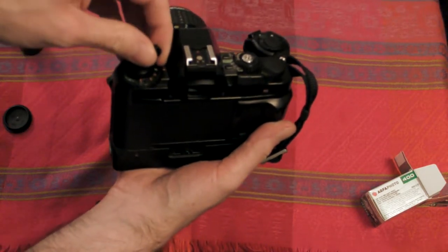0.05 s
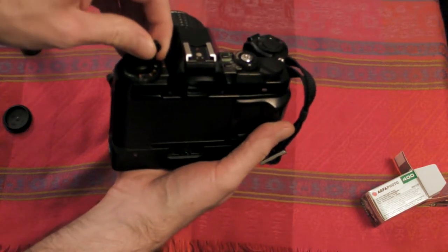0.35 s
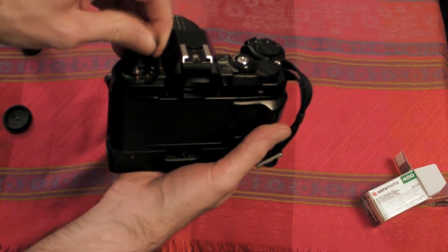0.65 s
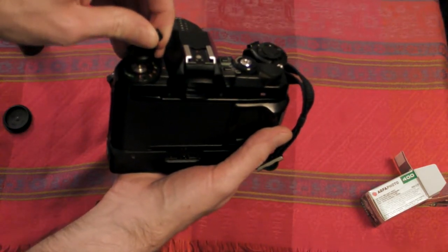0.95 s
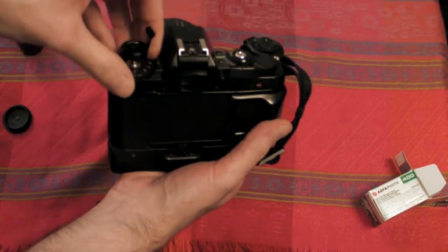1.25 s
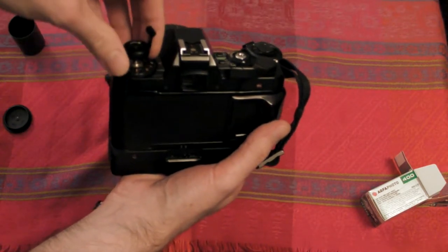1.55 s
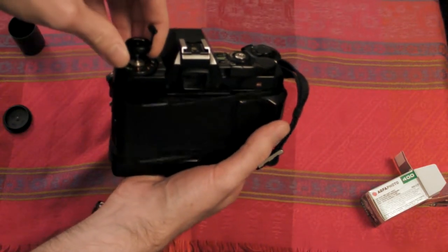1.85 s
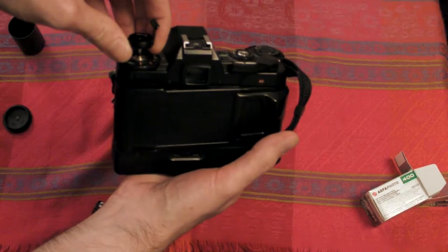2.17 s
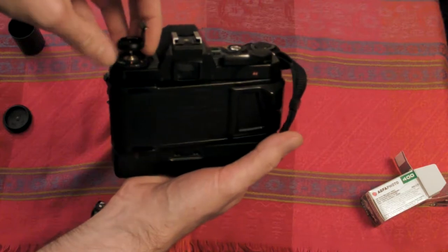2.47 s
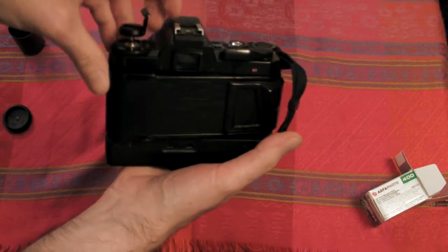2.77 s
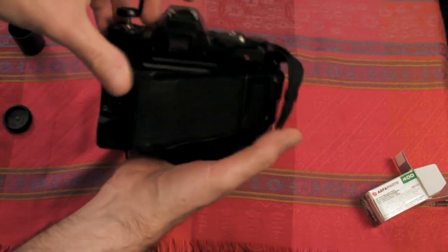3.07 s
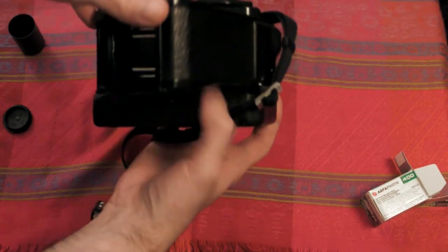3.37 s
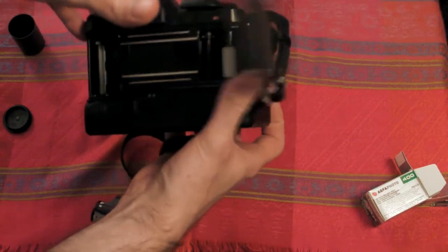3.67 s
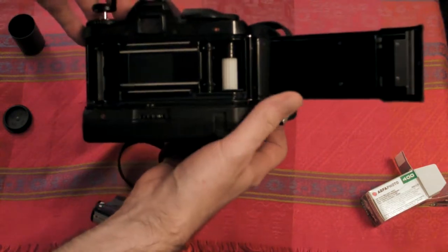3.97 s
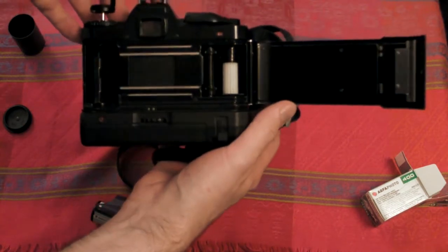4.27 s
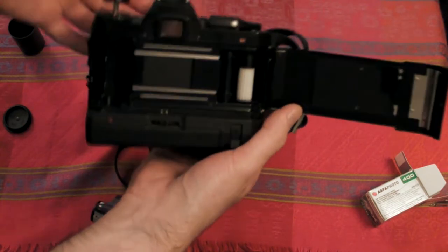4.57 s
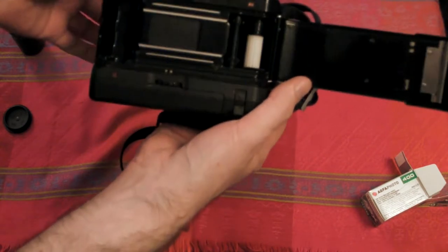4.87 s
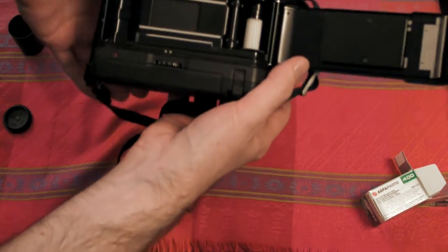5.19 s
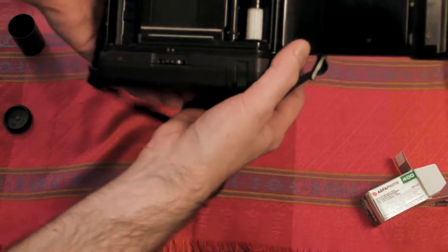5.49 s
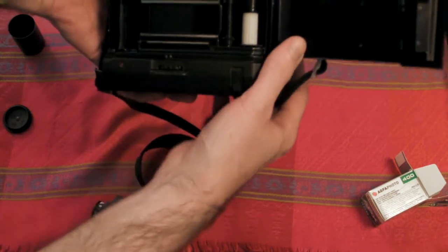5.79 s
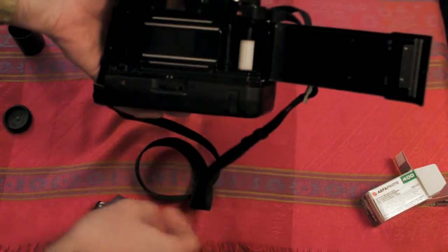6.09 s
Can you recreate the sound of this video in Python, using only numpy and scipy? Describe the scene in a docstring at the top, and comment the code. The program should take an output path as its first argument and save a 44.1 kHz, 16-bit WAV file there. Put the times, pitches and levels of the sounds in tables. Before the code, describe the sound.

Close, sharp clicks, a springy snap and small knocks of a film camera being opened by hand, over a faint electrical buzz.

```python
"""A small room, a cloth-covered table, a stereo pair close to a film camera being opened by hand.
Soft hiss and the buzz and thin whistle of video electronics lie under it from the start. At 0.6 s fingers
slide on the rewind knob and it clicks up. Near 1.8 s the latch slips and snaps, its spring rings and the
loose door rattles. Fingers tap and rub the case as the back swings open, with a light click at 3.5 s.
Past 5 s the back knocks twice against its stop and the fittings bounce to rest."""
import sys
import numpy as np
from scipy import signal
from scipy.fft import rfft, irfft
from scipy.io import wavfile

SR = 44100
rng = np.random.default_rng(int(sys.argv[2]) if len(sys.argv) > 2 else 0)


def generate_wav(sig):
    """Save sig (samples, or channels by samples) to the path in sys.argv[1] as 16-bit PCM at SR."""
    pcm = np.round(np.clip(np.atleast_2d(sig).T, -1, 1) * 32767).astype(np.int16)
    wavfile.write(sys.argv[1], SR, pcm)


N = 270774
TIME = np.arange(N) / SR
CUTOFF_HZ = 15900

# sprung parts hitting their stops: (time [s], part, snap level [dB], knock level [dB], decay [ms])
PART_STRIKES = [(.6068, "knob", -12, -25.5, 0.48), (1.7574, "latch", -16.5, -23.5, 4.1),
                (1.7624, "latch", -10, -46, 1.3), (1.8995, "spring", -9, -37, 3.5),
                (1.9082, "spring", -11, -28, 1.4), (1.9154, "spring", -19, -25.5, 1.4),
                (2.0229, "spring", -20, -52, 1.9), (2.0293, "spring", -18, -51, 1.8),
                (3.4772, "door", -29.5, -51, 1.1), (5.1839, "back", -21, -22, 1),
                (5.238, "back", -21.5, -23, 1.4)]
# each part's voice, part: (snap pitch [Hz], snap's room send [dB], knock pitch [Hz], knock sharpness [Q],
# knock's room send [dB], ring relative to snap [dB])
PART_VOICES = {"knob": (13354, -9.5, 1000, 4.5, -1, -21), "latch": (9000, -14, 2033, 2, -13, -22),
               "spring": (8199, -11.5, 1400, 2.8, -4.5, -22.5), "door": (6600, -14, 1778, 15, -6, -17),
               "back": (6203, -13, 1800, 2.5, -10.5, -14)}
# likeness of close sound at the two microphones: (frequency [Hz], correlation)
CLOSE_LIKENESS = [(1500, 0.82), (3400, 0.71), (5800, 0.1), (9000, 0.51), (13000, 0.74)]


def from_db(db):
    """Decibels to gain."""
    return 10 ** (np.asarray(db) / 20)


def at_hz(points, hz):
    """Read a table on a log-frequency axis."""
    known_hz, values = np.transpose(points)
    return np.interp(np.log(np.maximum(hz, 1)), np.log(known_hz), values)


def add(track, s, sound):
    """Mix a sound into a track from time s on."""
    start = round(s * SR)
    track[..., start:start + sound.shape[-1]] += sound[..., :N - start]


def butter(x, hz, kind, order=2):
    """Causal Butterworth filter."""
    return signal.sosfilt(signal.butter(order, np.clip(hz, 10, .48 * SR), kind, fs=SR, output="sos"), x)


def resonate(x, hz, width_hz):
    """One resonance with gain 1 at its peak."""
    return signal.lfilter(*signal.iirpeak(min(hz, SR / 2 - 1000), hz / width_hz, fs=SR), x)


def stereo_noise(length, likeness):
    """White noise that the two microphones share more or less, band by band."""
    mid, side = rfft(rng.standard_normal((2, length)))
    alike = np.clip(at_hz(likeness, np.fft.rfftfreq(length, 1 / SR)), -1, 1)
    spectra = np.sqrt((1 + alike) / 2) * mid + np.sqrt((1 - alike) / 2) * np.array([side, -side])
    return irfft(spectra, length)


def at_level(x, db, pan_db, window_s=.005):
    """Set a short sound's level, its energy counted over window_s; positive pan leans left."""
    power = np.sum(x ** 2, axis=1, keepdims=True) / (window_s * SR)
    return x / np.sqrt(power) * from_db(db + pan_db * np.array([[.5], [-.5]]))


def hiss():
    """Steady noise floor of the room and the microphones."""
    # noise spectrum: (frequency [Hz], density [dB per Hz])
    floor = [(25, -100), (40, -83), (60, -78.5), (110, -79), (220, -77), (400, -78.5), (650, -81.5),
             (1100, -84.5), (2000, -87.5), (4000, -90.5), (7000, -92), (9500, -98), (12200, -101.5),
             (15000, -99.5)]
    # its likeness at the two microphones: (frequency [Hz], correlation)
    likeness = [(1000, -.55), (4000, -.39), (8000, -.22), (13000, .1)]
    gain = from_db(at_hz(floor, np.fft.rfftfreq(N, 1 / SR))) * np.sqrt(SR / 2)
    return irfft(rfft(stereo_noise(N, likeness)) * gain, N)


def video_buzz(field_hz=59.94, line_hz=15734, pulse_s=.00139, buzz_gain_db=-37, whistle_db=-65):
    """One blanking pulse per picture field leaks in through a small capacitance; the line scan whistles."""
    since_pulse_s = (TIME - .0044) % (1 / field_hz)
    pulses = -np.clip((pulse_s - since_pulse_s) * SR, 0, 1)
    leak = butter(pulses, 190, "high", order=1)   # the capacitance passes the edges
    leak = butter(leak, 70, "high", order=1)
    buzz = from_db(buzz_gain_db) * butter(leak, 1500, "low")
    whistle = from_db(whistle_db) * np.sin(2 * np.pi * line_hz * TIME)
    return buzz + whistle


def rubs(grain_db=4.5, grain_hz=300, spread=1.7):
    """Sliding surfaces catch and let go: a grainy hiss that swells and fades."""
    # fingers sliding on the case and knob, and the latch's short scrape as it slips:
    # (middle [s], half length [s], level [dB], band centre [Hz])
    slides = [(0.599, 0.028, -39, 5170), (0.973, 0.01, -45.5, 3680), (1.06, 0.025, -51.5, 4970),
              (1.761, 0.014, -33, 6000), (3.634, 0.083, -52, 3350), (4.255, 0.023, -52.5, 7000),
              (4.624, 0.05, -52.5, 7760), (4.886, 0.014, -50.5, 6000), (5.378, 0.038, -48.5, 9700)]
    grain = butter(rng.standard_normal(N), grain_hz, "low")
    friction = stereo_noise(N, CLOSE_LIKENESS) * from_db(grain_db * grain / grain.std())
    out = np.zeros((2, N))
    for s, half_s, db, hz in slides:
        band = butter(friction, [hz / spread, hz * spread], "band", order=1)
        swell = np.sqrt(np.maximum(0, 1 - ((TIME - s) / half_s) ** 2))
        out += from_db(db) * band / band.std() * swell
    return out


def taps(decay_ms=1.8, tick_room_db=-9, knock_room_db=-10.5):
    """A soft contact gives mostly a round knock; a hard one gives a stronger and brighter tick."""
    # light taps and ticks on the case, and the knob and latch slipping just before they snap:
    # (time [s], tick level [dB], knock level [dB], knock pitch [Hz])
    taps_and_slips = [(.603, -23, -24.5, 3820), (.979, -40, -42, 1340), (1.06, -48.5, -50, 2600),
                      (1.187, -35, -56, 1560), (1.738, -65, -35, 1980), (1.7541, -33, -20, 3080),
                      (2.2882, -49.5, -48, 1470), (2.329, -39, -35.5, 1730), (2.717, -45, -53, 2440),
                      (2.897, -60, -48, 2900), (3.007, -49.5, -47, 1400), (3.0543, -56, -36.5, 3000),
                      (4.546, -47, -73, 3200), (4.579, -47, -49, 3400), (4.903, -39, -48, 1680),
                      (4.962, -37.5, -44.5, 1470), (5.316, -46, -33.5, 1460), (5.436, -43, -53, 2920)]
    for s, tick_db, knock_db, knock_hz in taps_and_slips + bounces():
        hardness_db = tick_db - knock_db
        tick_hz = min(knock_hz * 2.35 * 2 ** (hardness_db / 44), CUTOFF_HZ)   # harder contact, higher tick
        knock_q = 2 * 2 ** (-hardness_db / 8)   # softer contact, purer knock
        yield s, decay_ms, (tick_db, tick_hz, tick_room_db), (knock_db, knock_hz, knock_q, knock_room_db)


def snaps():
    """Sprung parts strike their stops, each with its own voice."""
    for s, part, snap_db, knock_db, decay_ms in PART_STRIKES:
        snap_hz, snap_room_db, knock_hz, knock_q, knock_room_db, _ = PART_VOICES[part]
        yield s, decay_ms, (snap_db, snap_hz, snap_room_db), (knock_db, knock_hz, knock_q, knock_room_db)


def chatter(decay_ms, rise_ms=.094, firmness=.61, length_s=.06):
    """Two hard faces meet in a quickly dying flurry of tiny impacts."""
    ms = TIME[:round(length_s * SR)] * 1000
    envelope = (1 - np.exp(-ms / rise_ms)) * np.exp(-(ms / decay_ms) ** firmness)
    return stereo_noise(len(ms), CLOSE_LIKENESS) * envelope + 1e-18


def case_colour(x):
    """The case lifts some bands and swallows others."""
    # resonances and dips: (centre [Hz], width [Hz], gain [dB])
    case_bands = [(1300, 430, 5.5), (1750, 120, 8), (2370, 330, -35), (3460, 2200, 2.5), (5880, 620, 3),
                  (9260, 1440, 6), (12900, 2500, -6)]
    for hz, width_hz, db in case_bands:
        x = x + (from_db(db) - 1) * resonate(x, hz, width_hz)
    return x


def contacts(snap_spread=1.47, knock_spread=2.1):
    """Each contact is a bright snap and a hollow knock; gives the direct sound and the room send."""
    direct, to_room = np.zeros((2, 2, N))
    for s, decay_ms, snap_voice, knock_voice in [*snaps(), *taps()]:
        snap_db, snap_hz, snap_room_db = snap_voice
        snap = butter(chatter(decay_ms), [snap_hz / snap_spread, snap_hz * snap_spread], "band", order=1)
        snap = butter(snap, 750, "high")   # small parts radiate little bass
        snap = at_level(case_colour(snap), snap_db, pan_db=.5)
        knock_db, knock_hz, knock_q, knock_room_db = knock_voice
        knock = butter(chatter(decay_ms), [knock_hz / knock_spread, knock_hz * knock_spread], "band")
        knock = at_level(resonate(knock, knock_hz, knock_hz / knock_q), knock_db, pan_db=-.8)
        add(direct, s, snap + knock)
        add(to_room, s, from_db(snap_room_db) * snap + from_db(knock_room_db) * knock)
    return direct, to_room


def part_ring(phase_spread_rad=.43, swell_cycles=.43):
    """Every snap leaves its part ringing in step with its strength; each mode swells in about a cycle."""
    # each part's modes: (frequency [Hz], relative level [dB], time to fall 60 dB [s])
    knob = [(90, 0, .045), (264, 0.5, 0.061), (737, -4, 0.15), (1016, 2.5, .14), (1178, 1.5, 0.12),
            (7600, 21, 0.028), (7500, -10, 0.28), (13240, 23, .015)]
    latch = [(560, -4, .03), (1954, -5, .25), (4975, -1, .19), (5066, -5, .22), (5986, -3, .3),
             (9315, -6, .24), (10970, -7, .15), (13960, -3, .1)]
    spring = [(420, -5, .05), (720, -4, .08), (4904, -6, .22), (6030, 7, .07), (6125, -1, .31),
              (7193, -4, .18), (8765, -3, .09), (8991, -1, .13), (9203, -7, .13), (9546, -4, .09)]
    door = [(1800, 5, .03), (5000, 6, .14), (6000, 1, .16), (9500, -3, .14)]
    back = [(1235, -1.5, 0.2), (1490, -16, .18), (1976, 8.5, 0.081), (2105, -1, .2), (2300, -8, 0.081),
            (2860, 16, 0.017), (3520, 5, 0.036)]
    modes = {"knob": knob, "latch": latch, "spring": spring, "door": door, "back": back}
    out, t = np.zeros((2, N)), TIME[:SR // 2]
    for s, part, snap_db, *_ in PART_STRIKES:
        *_, ring_db = PART_VOICES[part]
        for hz, db, t60 in modes[part]:
            phase = rng.uniform(0, 2 * np.pi) + rng.normal(0, phase_spread_rad, (2, 1))
            height = from_db(snap_db + ring_db + db + rng.standard_normal())
            envelope = (1 - np.exp(-t * hz / swell_cycles)) * np.exp(-np.log(1000) * t / t60)
            add(out, s, height * envelope * np.sin(2 * np.pi * hz * t + phase))
    return out


def bounces(count=5):
    """The loose door or a fitting taps again and again, weaker each time."""
    # (start [s], tick level [dB], knock level [dB], knock pitch [Hz], gap [s], loss per bounce [dB])
    rattles = [(1.931, -25.5, -33.5, 2540, .0088, 1.5), (3.796, -43.5, -41, 2430, 0.0052, 2.5),
               (4.979, -36.5, -56, 1770, 0.0065, 4), (5.2533, -31.5, -31, 2020, .0145, 9.5),
               (5.482, -32.5, -33.5, 1750, 0.004, 11)]
    return [(s + k * gap_s, tick_db - k * loss_db, knock_db - k * loss_db, hz)
            for s, tick_db, knock_db, hz, gap_s, loss_db in rattles for k in range(count)]


def room(x, first_echo_s=.0046, build_s=.0017, tail_s=.6):
    """The small room's diffuse tail starts with the nearest surfaces and dies soonest in the top treble."""
    # reverberation: (frequency [Hz], time to fall 60 dB [s])
    decay_times = [(200, 0.3), (1000, 0.4), (3000, 0.49), (8000, 0.31), (15000, 0.24)]
    # the tail's likeness at the two microphones: (frequency [Hz], correlation, limited to +-1 in use)
    likeness = [(900, 1), (2000, 0.71), (3500, 0.0074), (6000, -1.06), (14000, 0.035)]
    t = TIME[:round(tail_s * SR)]
    white, hz = rfft(stereo_noise(len(t), likeness)), np.fft.rfftfreq(len(t), 1 / SR)
    edges_hz = np.geomspace(80, SR / 2, 9)
    tail = np.zeros((2, len(t)))
    for low, high in zip(edges_hz, edges_hz[1:]):
        band = irfft(white * ((hz >= low) & (hz < high)), len(t))
        tail += band * np.exp(-np.log(1000) * t / at_hz(decay_times, np.sqrt(low * high)))
    tail *= np.clip((t - first_echo_s) / build_s, 0, 1)
    return signal.fftconvolve(x, tail / np.sqrt(np.sum(tail ** 2) / 2), axes=1)[:, :N]


def scene(ring_and_rub_room_db=-18):
    """The camera close to the microphones, the room behind it, steady buzz and hiss underneath."""
    direct, to_room = contacts()
    ring_and_rub = part_ring() + rubs()
    reverberation = room(to_room + from_db(ring_and_rub_room_db) * ring_and_rub)
    return direct + ring_and_rub + reverberation + video_buzz() + hiss()


def record(dry):
    """The recorder clips peaks at full scale and cuts the top treble steeply."""
    top_cut = signal.ellip(10, .1, 70, CUTOFF_HZ, fs=SR, output="sos")
    return signal.sosfilt(top_cut, np.clip(dry, -1, 1))


dry = scene()
out = record(dry)
generate_wav(out)
```